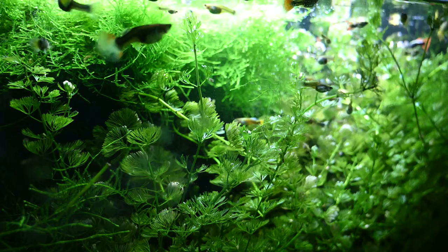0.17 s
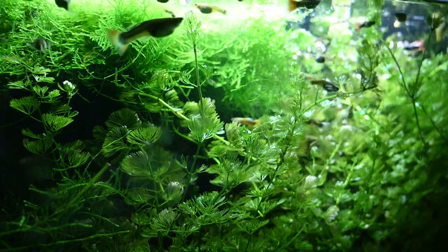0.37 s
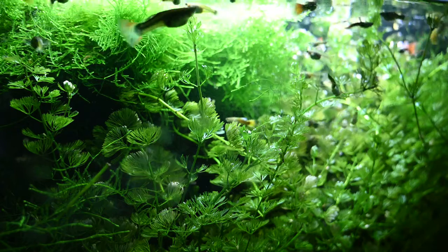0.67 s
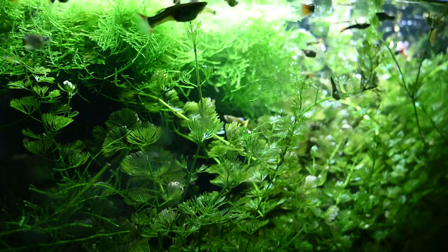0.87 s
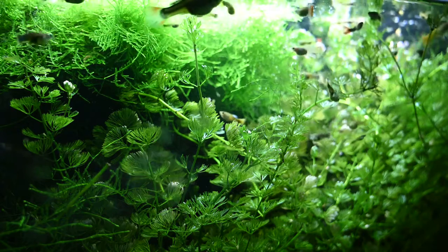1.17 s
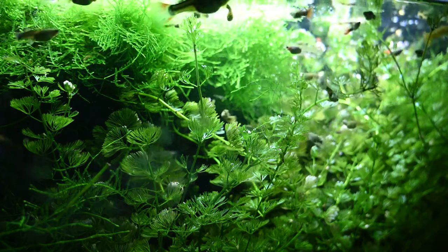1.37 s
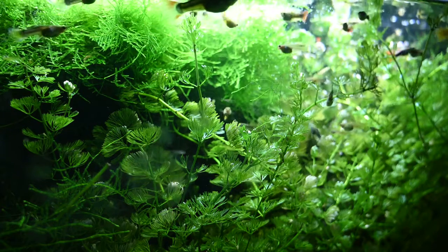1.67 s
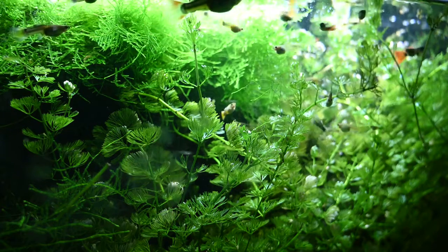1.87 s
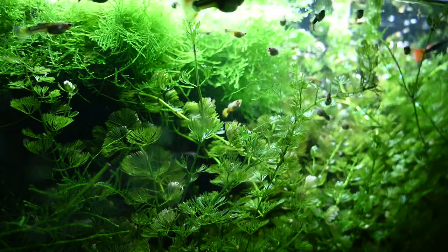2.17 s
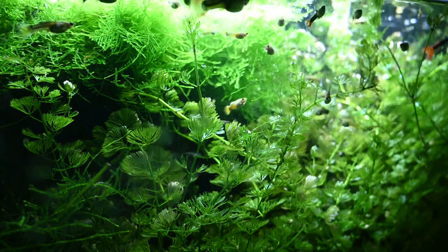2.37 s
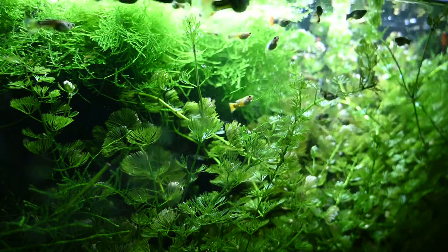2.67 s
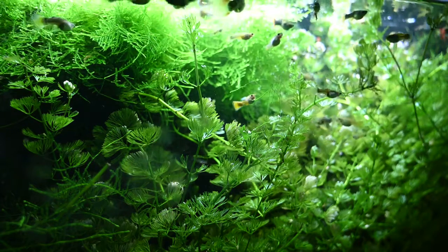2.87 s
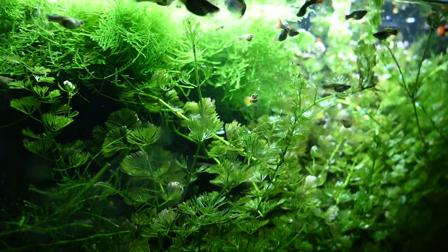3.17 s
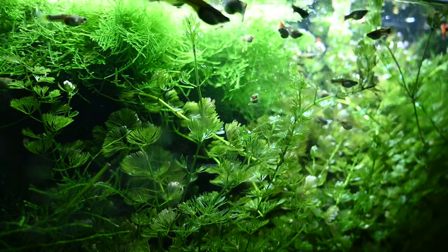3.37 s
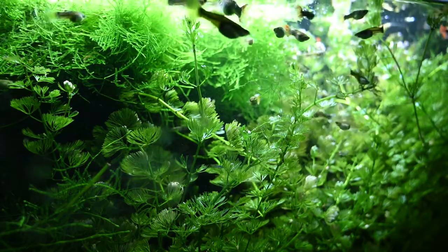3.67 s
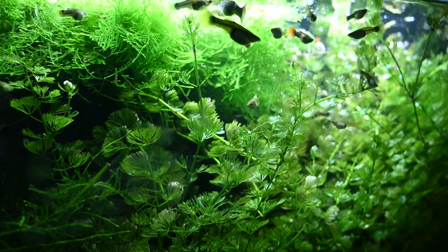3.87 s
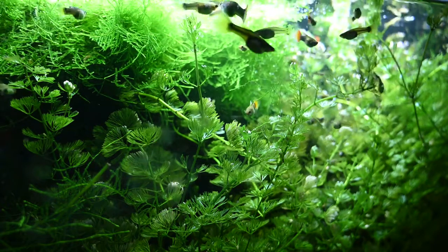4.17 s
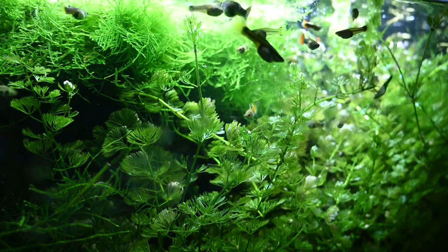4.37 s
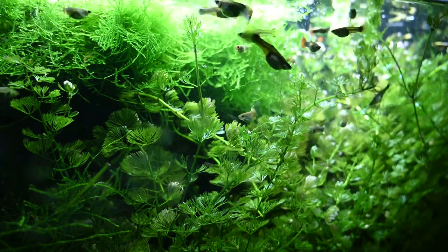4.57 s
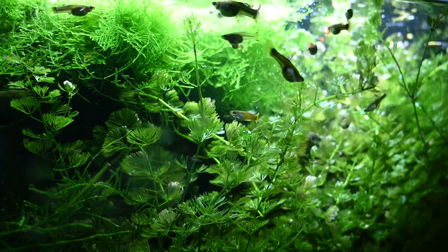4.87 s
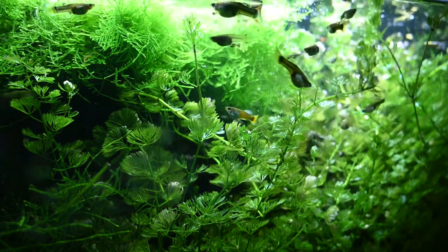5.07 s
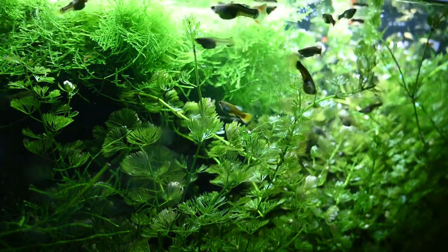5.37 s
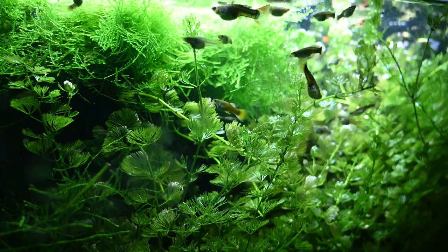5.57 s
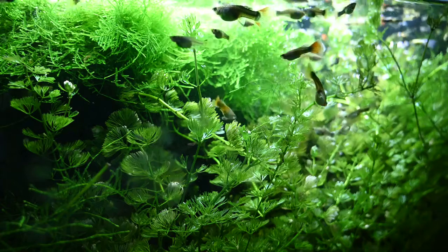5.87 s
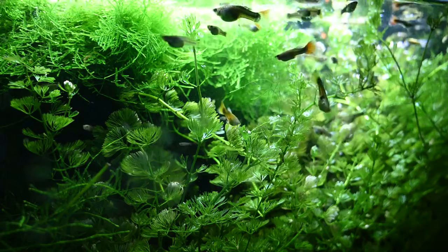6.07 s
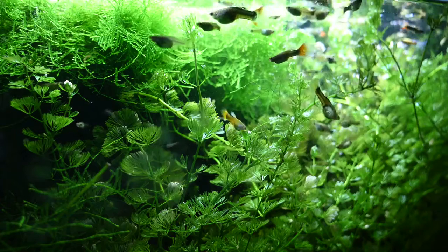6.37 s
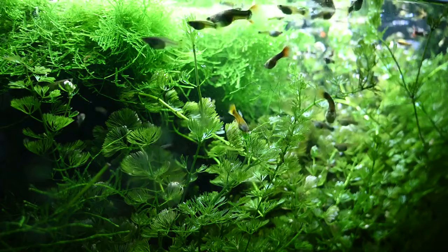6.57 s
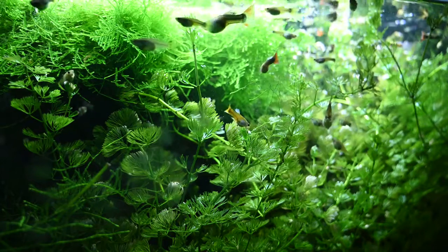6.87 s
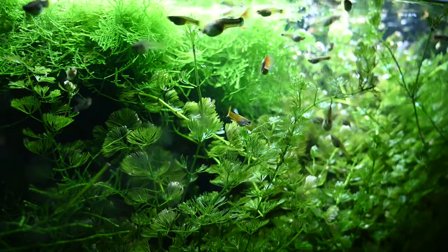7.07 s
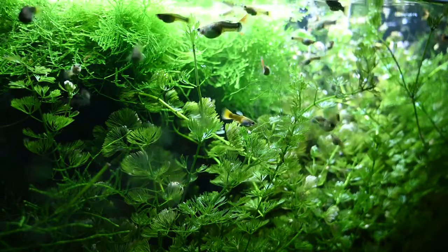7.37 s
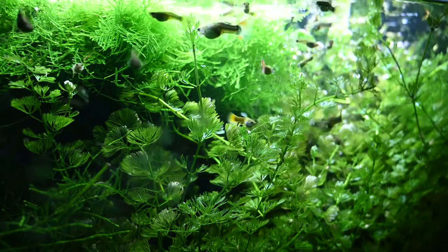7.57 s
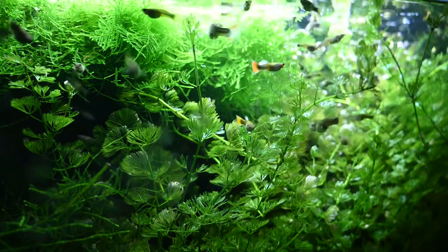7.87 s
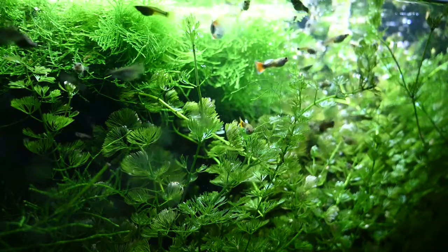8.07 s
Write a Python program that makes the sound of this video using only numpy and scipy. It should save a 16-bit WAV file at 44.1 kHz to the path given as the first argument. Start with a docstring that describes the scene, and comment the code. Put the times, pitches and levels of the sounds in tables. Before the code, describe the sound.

An aquarium filter hums low and steady over a dull watery rumble while its outflow trickles with small bright bubble plinks and ticks.

```python
"""A steady pump hum over a dull rumble and churning water is heard first: an aquarium filter in a quiet room.
Hum is wavering mains harmonics, rumble is shaped noise, churn is throbbing noise through housing resonances.
The outflow trickles: fizz is noise gated by tiny splashes, bubbles are decaying sines, droplets are
noise snaps. Bubbles and droplets echo briefly between water, glass and walls; a faint hiss lies below."""
import sys
import numpy as np
from scipy import signal
from scipy.fft import rfft, irfft
from scipy.io import wavfile
from scipy.ndimage import uniform_filter1d

SR = 44100
rng = np.random.default_rng(int(sys.argv[2]) if len(sys.argv) > 2 else 0)


def pcm_store(signal):
    """Save signal as 16-bit PCM."""
    levels = np.round(np.clip(np.atleast_2d(signal), -1, 1) * 32767)
    wavfile.write(sys.argv[1], SR, levels.astype(np.int16).T)


N = 362502
TIME = np.arange(N) / SR  # s
FREQ = np.arange(N // 2 + 1) * SR / N  # Hz
MAINS_HZ = 59.98
TOP_HZ = 15800  # upper limit of all sound
# a bubble of the usual size: pitch and decay time
BUBBLE_HZ, RING_S = 4046, 0.0037


def undb(db):
    """Amplitude gain is the exponential of a level in decibels."""
    return 10 ** (np.asarray(db) / 20)


def level(x, db):
    """Root-mean-square amplitude sets the level of a signal."""
    return x * undb(db) / np.sqrt(np.mean(x ** 2))


def pan(db):
    """Interaural level difference: left minus right, split evenly between the two gains."""
    return undb(np.array([[db], [-db]]) / 2)


def colour(x, points):
    """Linear filtering shapes a spectrum: (f/Hz, gain/dB) points are joined on a log-frequency axis."""
    hz, db = np.transpose(points)
    gain = undb(np.interp(np.log(FREQ + 1), np.log(hz), db))
    return irfft(rfft(x) * gain, N)


def walk(rate):
    """Low-pass random modulation: values held for 1 / rate s, smoothed twice, scaled to unit rms."""
    hold = max(int(SR / rate), 2)
    steps = np.repeat(rng.standard_normal(N // hold + 1), hold)
    smooth = uniform_filter1d(uniform_filter1d(steps, hold), hold)
    return level(smooth[:N], 0)


def noise(side_db):
    """Partial coherence: white noise of unit power whose side-to-mid ratio sets its stereo width."""
    mid, side = rng.standard_normal((2, N))
    return level(mid + undb(side_db) * side * np.array([[1], [-1]]), 0)


def add(out, s, sound):
    """Superposition: mix a stereo sound in at time s."""
    i = int(np.clip(s * SR, 0, N - 1))
    out[:, i:i + sound.shape[1]] += sound[:, :N - i]


def hum(waver_rate=7, slow_rate=2.194, slow_share=.35):
    """Forced vibration: the motor shakes the tank at mains multiples, each with its own quick and slow waver."""
    # pump lines: [multiple of mains frequency, level/dB before panning, waver relative to amplitude]
    harmonics = [(.5, -74, 0.39), (1, -58, 0.17), (2, -43, 0.023), (3, -55, 0.48), (4, -65.5, 0.58),
                 (5, -69, 0.45), (6, -50.5, 0.089), (7, -68.5, 0.42), (8, -68, 0.38), (9, -73.5, 0.63),
                 (10, -73.5, 0.38)]
    out = 0
    for multiple, db, waver in harmonics:
        quick = walk(waver_rate) + 1j * walk(waver_rate)  # complex: sways amplitude and phase
        slow = walk(slow_rate)
        swing = 1 + waver * (np.sqrt(1 - slow_share / 2) * quick + np.sqrt(slow_share) * slow)
        carrier = np.exp(2j * np.pi * (multiple * MAINS_HZ * TIME + rng.random()))
        out = out + level(np.real(swing * carrier), db)
    return out


def drone():
    """Broadband flow noise: moving water rumbles dully, nearly coherent on both sides."""
    # low drone of the tank, its stand and the room: [f/Hz, density level/dB per Hz before panning]
    rumble_density = [(15, -100), (28, -83), (40, -91), (55, -75.5), (100, -81), (160, -74), (200, -79),
                      (250, -77.5), (340, -80), (480, -83), (640, -85), (1500, -102), (5000, -130)]
    return colour(noise(side_db=-14.5), rumble_density) * np.sqrt(SR / 2)


def churn(db=-51.5, throb=0.16):
    """Resonance: water stirred once a turn, in uneven surges, rings the housing; its treble is less coherent."""
    # housing resonances: [f/Hz, half-power width/Hz, gain/dB relative, before the treble roll-off]
    resonances = [(501, 17, -11), (691, 12.4, 0), (823, 92, -1.5), (974, 36, -1.5), (1052, 30, 2),
                  (1240, 124, -2), (1375, 69, -12.5), (1509, 23, -2.5), (1632, 76, -5), (1946, 310, -10),
                  (2506, 28, -3), (2670, 75, -4.5), (3120, 110, -10), (3200, 8.3, -18), (3460, 116, -8.5)]
    housing_top_hz = 3630  # the housing passes little above this
    surge = undb(.9 * walk(16) + .7 * walk(5))
    stir = (1 + throb * np.sin(2 * np.pi * MAINS_HZ * TIME)) * surge
    mid, side = rfft(rng.standard_normal((2, N)) * stir)
    # the side signal grows with frequency until it equals the mid
    scattered = np.minimum(FREQ / 4800, 1) * np.array([[1], [-1]])
    power = 0
    for hz, width, gain_db in resonances:
        detuning = (FREQ ** 2 - hz ** 2) / (width * FREQ + 1)
        power = power + undb(gain_db) ** 2 / (1 + detuning ** 2)
    power = power / (1 + (FREQ / housing_top_hz) ** 8)
    power = power / (1 + scattered ** 2)  # keeps total power despite the added side
    return level(irfft((mid + scattered * side) * np.sqrt(power), N), db)


def sputter(scatter_db, decay_s, count):
    """Shot noise: power of many splashes at random times, each decaying exponentially; mean 1."""
    when, size = rng.random((count, 2)).T
    strength = undb(-scatter_db * np.log(.006 + size)) ** 2  # few strong, many weak
    power = np.bincount((N * when).astype(int), strength, N)
    power = signal.lfilter([1], [1, -np.exp(-2 / (decay_s * SR))], power)
    return power / power.mean()


def fizz(flow_db=1.03):
    """Modulated noise: splashes where the stream lands gate each band, partly in step with all the others."""
    # fine fizz where the stream lands: [f/Hz, density level/dB per Hz before flow and panning]
    fizz_density = [(500, -108), (1200, -105), (2400, -88.5), (3600, -92.5), (5000, -96.5), (6500, -96),
                    (8400, -98), (10000, -99), (13000, -100.5), (15500, -105.5)]
    broad = sputter(scatter_db=4, decay_s=.012, count=1800)
    spray = rfft(rng.standard_normal((2, N)))
    edges = np.geomspace(1000, TOP_HZ, 13)
    out = 0
    for low, high in zip(edges, edges[1:]):
        share = .15 + .45 * low / TOP_HZ  # power that follows the broadband splashes
        own = sputter(scatter_db=4.5, decay_s=0.03, count=1400)
        power = share * broad + (1 - share) * own
        band = irfft(spray * ((FREQ >= low) & (FREQ < high)), N)
        out = out + band * np.sqrt(power)
    flow = undb(flow_db * walk(6))
    return colour(out * flow, fizz_density) * np.sqrt(SR / 2) * pan(-2.2)


def hiss():
    """Stationary noise: a smooth, faint hiss, independent on the two sides."""
    # smooth hiss: [f/Hz, density level/dB per Hz before panning]
    hiss_density = [(100, -100), (1000, -101), (4000, -98.5), (8000, -97), (11000, -101.7), (15500, -100.7)]
    return colour(rng.standard_normal((2, N)), hiss_density) * np.sqrt(SR / 2) * pan(-3)


def echoes(x, glass_db, glass_t60, room_db, room_t60):
    """Reverberation: direct sound, quick reflections off glass and water, then the room, distinct at each ear."""
    t = TIME[:SR // 2]
    near, far = rng.standard_normal((2, 2, len(t)))
    response = 0
    for grain, db, t60 in ((near, glass_db, glass_t60), (far, room_db, room_t60)):
        tail = grain * np.exp(-np.log(1000) * t / t60)
        response = response + undb(db) * tail / np.sqrt(np.sum(tail ** 2) / 2)
    response[:, 0] += 1
    response = response / np.sqrt(np.sum(response ** 2) / 2)
    return signal.fftconvolve(x, response, axes=1)[:, :N]


def landing(trickle_pan_db=0.5, stray_db=5):
    """Localization by level difference: each drop lands at random around the stream."""
    return pan(trickle_pan_db + stray_db * rng.standard_normal())


def plink(hz, splash_db=-7, rise=.02):
    """Damped oscillation: a bubble rings, rising slightly, amid a rough splash; bigger ones last longer."""
    t = TIME[:SR // 25]
    age = t / (RING_S * np.sqrt(BUBBLE_HZ / hz))  # in decay times
    band = signal.butter(2, [0.87 * hz, 1.2 * hz], "band", fs=SR)
    rough = signal.lfilter(*band, rng.standard_normal((2, len(t))))
    splash = level(rough, splash_db) * np.exp(-age / 2)
    ring = np.exp(-age) * np.sin(2 * np.pi * hz * t * (1 + rise * age))
    # the air pocket takes a few cycles to pinch off
    sound = (splash + ring) * (1 - np.exp(-t * hz / 1.2))
    return sound / np.sqrt(np.mean(sound[:, :SR // 125] ** 2))  # unit rms over the first 8 ms


def bubbles(crowd_db=-57.5, range_db=8, spread_octaves=.38, count=190):
    """Bubble resonance: clear plinks over a mostly faint crowd, where higher pitch means fainter; all echo."""
    # the loudest bubbles: [t/s, starting f/Hz, level/dB of the first 8 ms before panning and echoes]
    clear_bubbles = [(.096, 3350, -50), (.265, 4100, -48.5), (.341, 6060, -49.5), (.585, 5740, -48.5),
                     (.711, 4300, -55), (.757, 2900, -50), (1.129, 4860, -53), (1.519, 4600, -55),
                     (1.764, 3000, -40.5), (2.344, 4100, -53.5), (2.739, 4900, -55), (3.212, 5030, -50),
                     (3.3, 5400, -51.5), (3.471, 4540, -49.5), (3.557, 5850, -54), (3.602, 3360, -51),
                     (3.687, 3380, -52), (3.716, 4170, -47), (3.974, 3400, -50), (3.986, 2240, -47),
                     (4.07, 5500, -53), (4.222, 2920, -46), (4.445, 4340, -49), (4.626, 4560, -52.5),
                     (4.662, 3460, -48), (4.943, 2800, -46), (5.077, 4750, -48), (5.111, 4700, -55),
                     (5.244, 5680, -53.5), (5.38, 3700, -52.5), (5.514, 4630, -47), (5.924, 3420, -49.5),
                     (5.981, 2180, -43), (6.064, 2540, -51), (6.428, 2920, -42.5), (6.526, 3430, -50),
                     (6.776, 3250, -50.5), (7.287, 4350, -53), (7.533, 2790, -45), (7.802, 4860, -47),
                     (7.831, 3070, -45), (7.978, 5500, -53), (8.035, 3180, -46.5), (8.158, 4460, -55)]
    fainter_db_per_octave = 6.5
    out = np.zeros((2, N))
    for s, hz, db in clear_bubbles:
        add(out, s, plink(hz) * undb(db) * landing())
    for when, faint in rng.random((count, 2)):
        octaves = spread_octaves * np.clip(rng.standard_normal(), -2, 2)
        db = crowd_db - range_db * np.sqrt(faint) - fainter_db_per_octave * octaves
        add(out, when * N / SR, plink(BUBBLE_HZ * 2 ** octaves) * undb(db) * landing())
    return echoes(out, glass_db=-5.5, glass_t60=.05, room_db=-9, room_t60=.22)


def droplet(low_hz, snap_s=.00025, splash_s=.003, snap_db=14.5, spray_s=.0082, spray_db=-2.5):
    """Impact noise: a snap, a short splash and a second snap as spray falls back, all high-passed at low_hz."""
    t = TIME[:SR // 25]
    bright = signal.butter(3, low_hz, "high", fs=SR)
    grain = np.diff(rng.standard_normal((2, len(t) + 1)))  # differencing tilts noise to the treble
    splash = level(record(signal.lfilter(*bright, grain)), 0)
    late = t - spray_s * rng.random()  # spray_s is the longest delay
    snaps = np.exp(-t / snap_s) + undb(spray_db) * (late > 0) * np.exp(-np.abs(late) / snap_s)
    return splash * (undb(snap_db) * snaps + np.exp(-t / splash_s))


def ticks(patter_db=-61, range_db=7, big_hz=5000, small_hz=14500, count=34):
    """Impulsive excitation: clear droplets hit the surface amid a faint patter; smaller ones start higher."""
    # the loudest droplets: [t/s, splash onset level/dB before snap, panning and echoes, lower cutoff f/Hz]
    clear_droplets = [(.345, -52, 4500), (.587, -49, 5000), (2.369, -52, 12000), (2.501, -47.5, 8500),
                      (3.119, -51, 8000), (3.719, -53, 3000), (4.176, -56, 9000), (4.465, -54, 6000),
                      (4.879, -49, 5000), (4.886, -49, 5000), (5.537, -51, 7000), (6.133, -52, 9000),
                      (6.779, -52, 5000), (7.486, -50.5, 6500), (7.51, -55, 6000), (7.831, -53, 4500),
                      (7.892, -54, 13000), (8.05, -52, 11000)]
    out = np.zeros((2, N))
    for s, db, low_hz in clear_droplets:
        add(out, s, droplet(low_hz) * undb(db) * landing())
    for when, faint, size in rng.random((count, 3)):
        low_hz = small_hz + size * (big_hz - small_hz)
        db = patter_db - range_db * faint
        add(out, when * N / SR, droplet(low_hz) * undb(db) * landing())
    return echoes(out, glass_db=-7, glass_t60=.035, room_db=-10, room_t60=.2)


def scene():
    """Interaural time and level differences: the pump, to the right, reaches the left later and weaker."""
    left_lag_s = .0001
    lag = np.exp(-2j * np.pi * FREQ * np.array([[left_lag_s], [0]]))
    pump = irfft(rfft(hum() + drone() + churn()) * lag, N) * pan(-.6)
    return pump + fizz() + hiss() + bubbles() + ticks()


def record(dry):
    """Band limiting: a steep elliptic low-pass removes what lies above the top frequency."""
    low_pass = signal.ellip(12, .1, 80, TOP_HZ, fs=SR, output="sos")
    return signal.sosfilt(low_pass, dry)


dry = scene()
out = record(dry)
pcm_store(out)
```